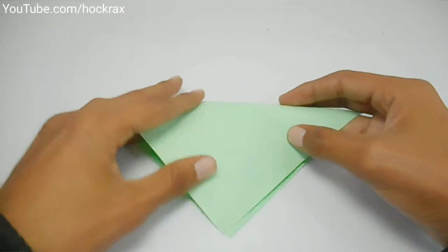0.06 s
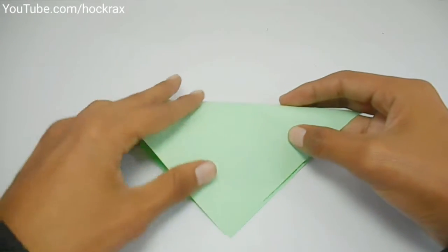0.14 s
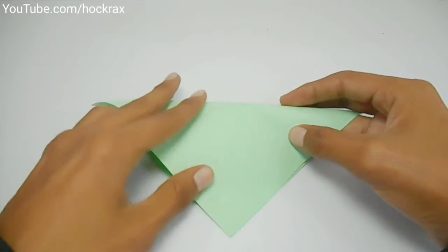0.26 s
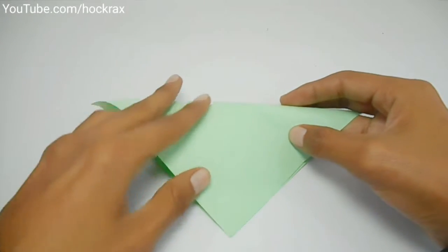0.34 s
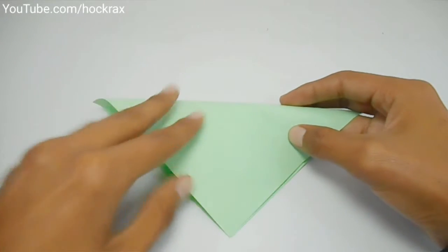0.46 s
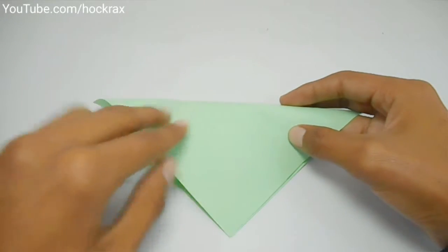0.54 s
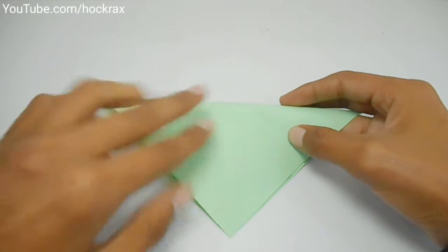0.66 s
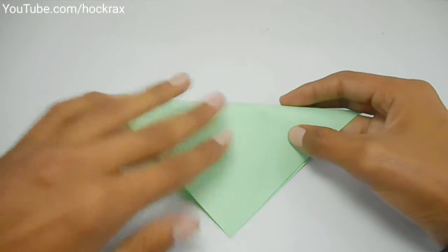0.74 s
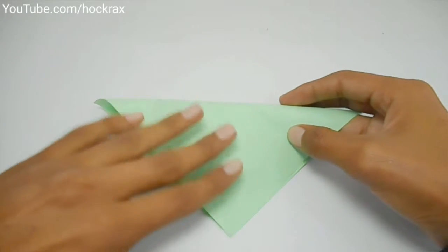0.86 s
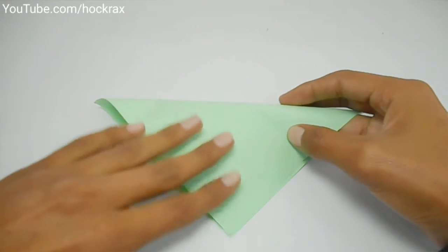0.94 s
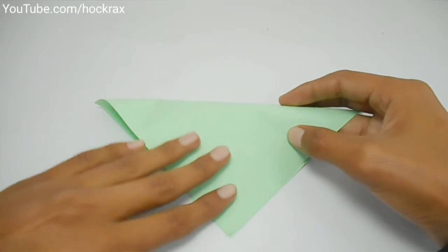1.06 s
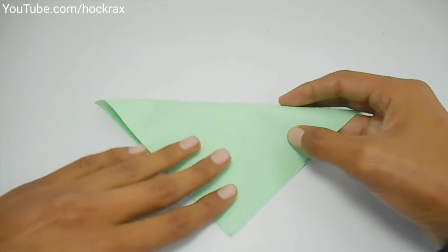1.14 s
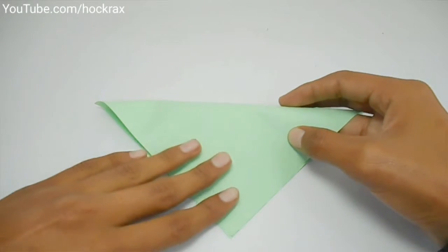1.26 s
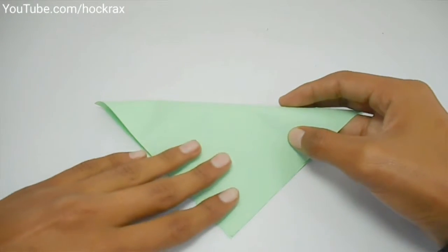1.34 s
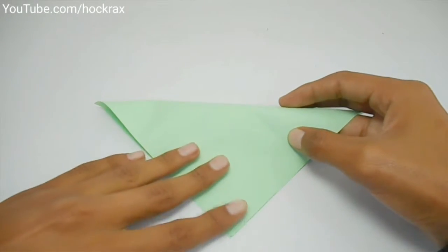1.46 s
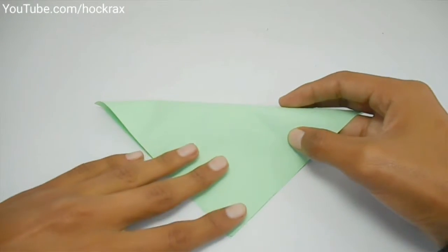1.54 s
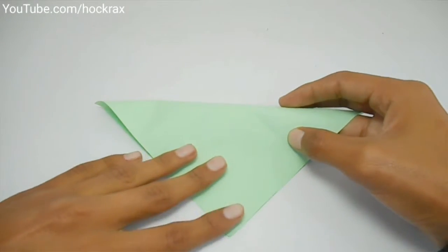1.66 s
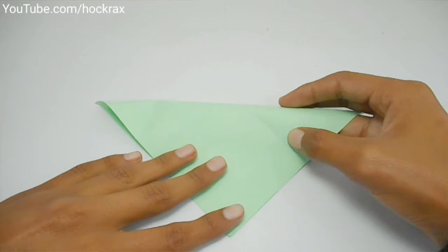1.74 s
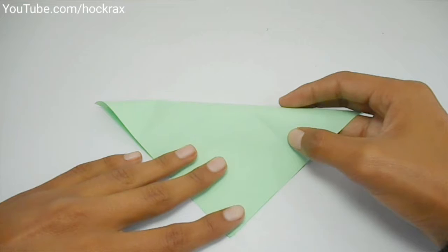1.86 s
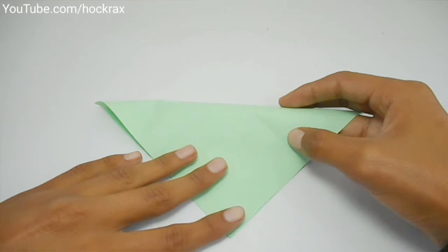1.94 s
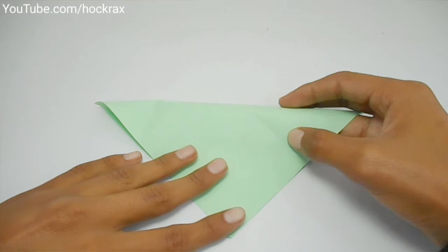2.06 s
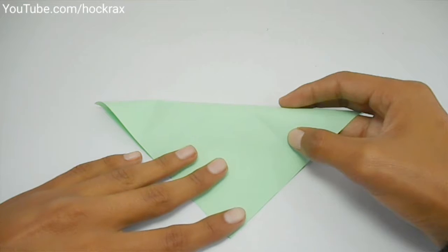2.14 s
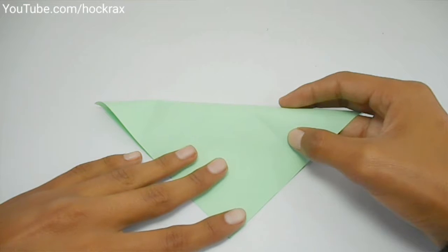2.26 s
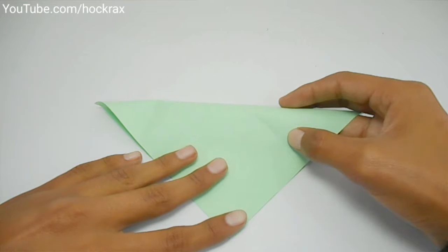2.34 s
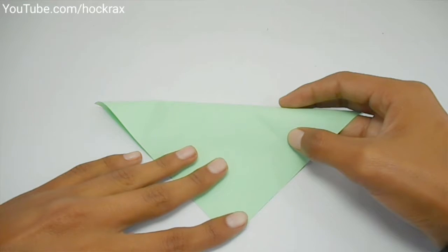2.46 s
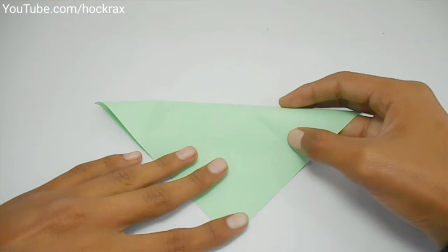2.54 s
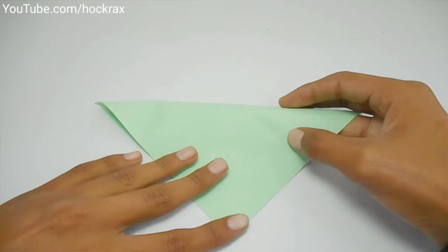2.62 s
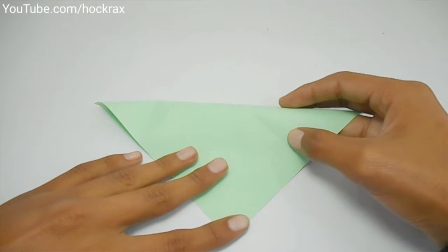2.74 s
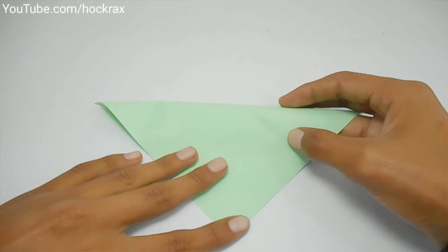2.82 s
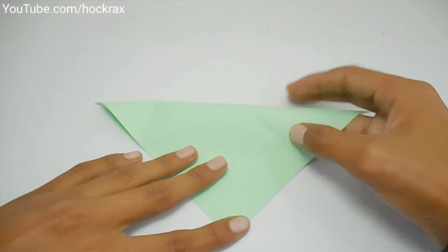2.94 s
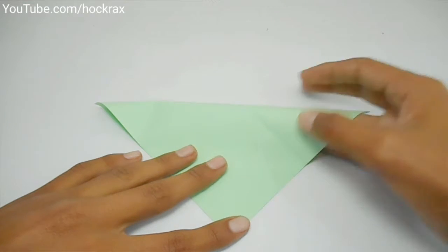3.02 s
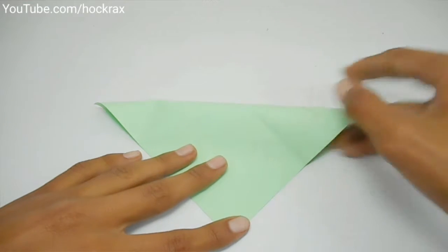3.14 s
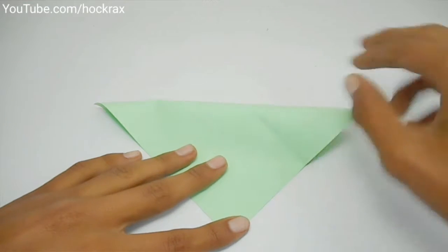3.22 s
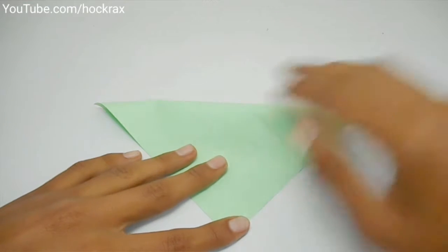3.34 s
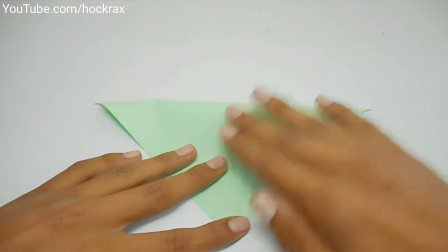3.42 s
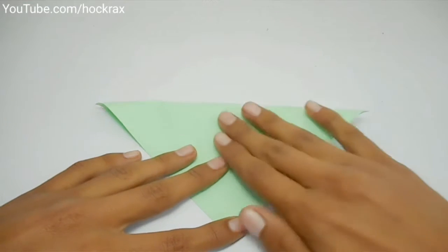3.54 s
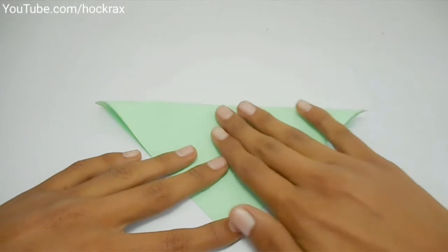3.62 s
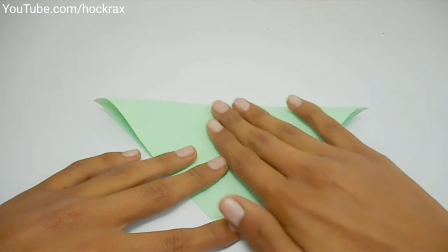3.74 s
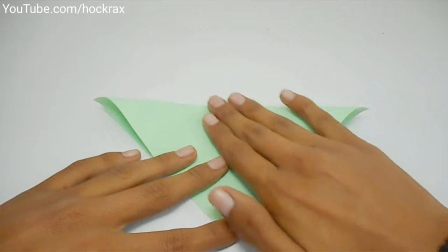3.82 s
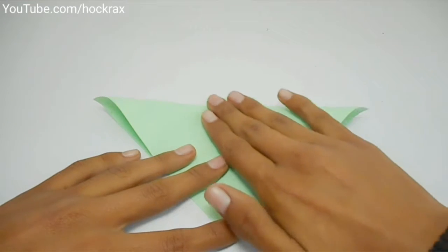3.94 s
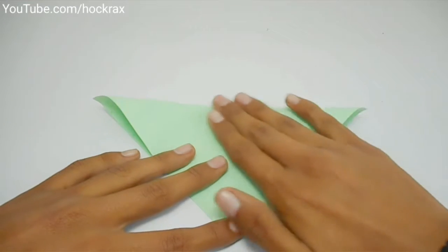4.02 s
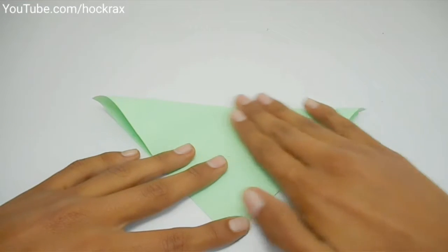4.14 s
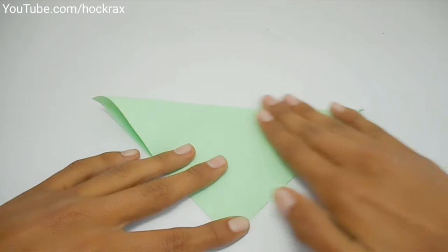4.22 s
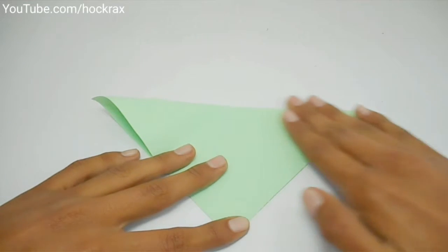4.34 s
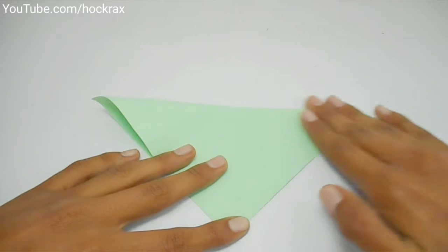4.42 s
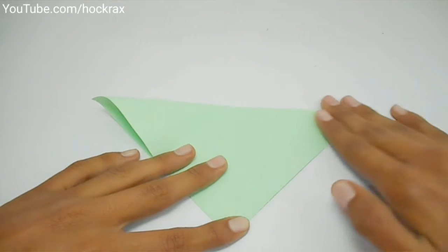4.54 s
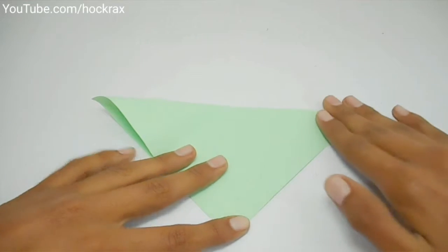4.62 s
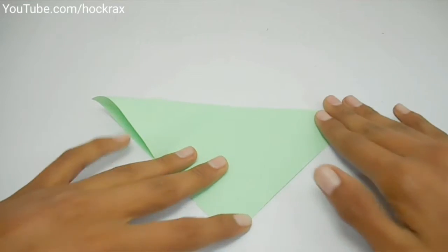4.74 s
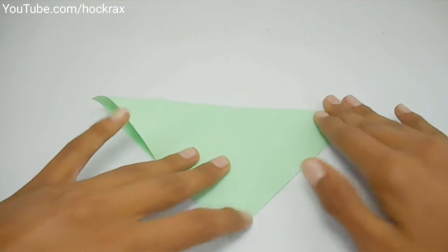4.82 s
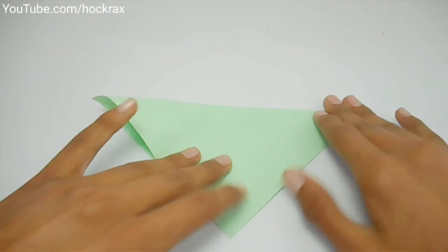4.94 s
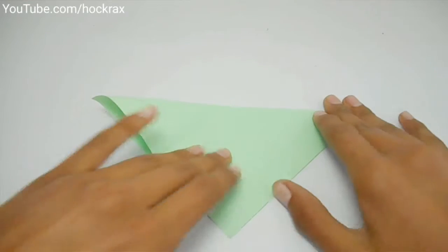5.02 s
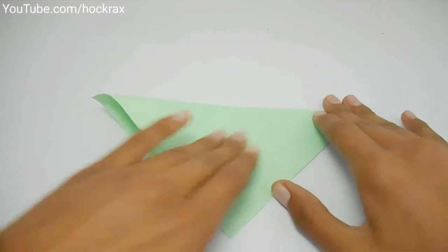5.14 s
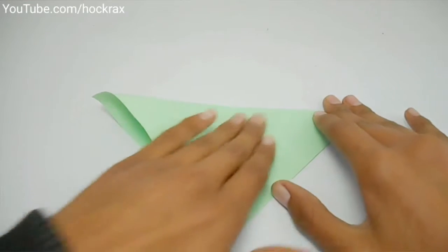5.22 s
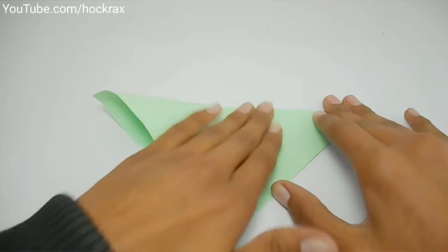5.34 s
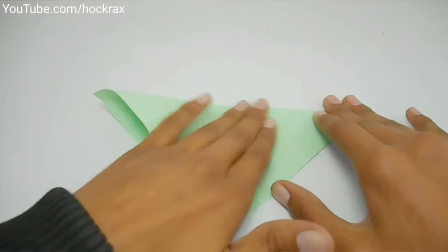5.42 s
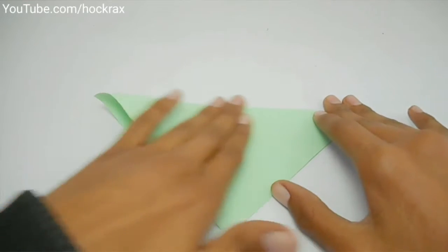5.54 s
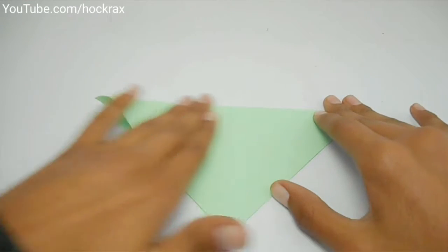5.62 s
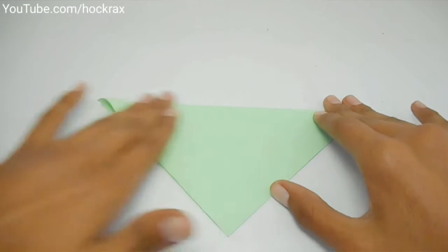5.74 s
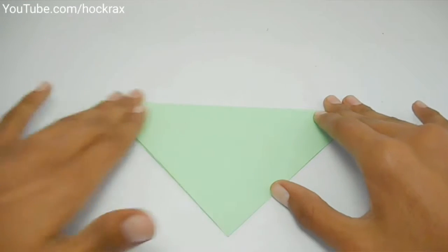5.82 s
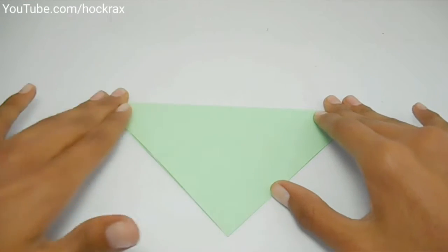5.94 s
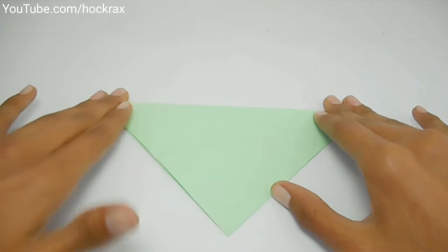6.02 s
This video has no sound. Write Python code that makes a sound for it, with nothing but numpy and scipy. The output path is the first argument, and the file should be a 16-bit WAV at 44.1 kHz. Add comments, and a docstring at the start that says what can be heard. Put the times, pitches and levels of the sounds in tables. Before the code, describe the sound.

Dry paper handling on a table, heard very near: fluttering brushes and ticks first, a distant wavering horn behind them, then a single loud crack of buckling paper. Quiet room air and intermittent low rumble remain until a hand withdraws with a crackling rustle. Dense grainy strokes smooth the fold one way, pause, then the other way, ending with a light pop amid more rubbing.

```python
"""Fingers brush loosely over a raised, folded sheet of paper close to the microphone, as a far horn sounds outside.
Skin dragging on fibres is made of filtered slips; fingers tick on the paper, a faint hiss leads into one loud snap
as it buckles. Firm pushes smooth its crease to the right and to the left, a hand thuds softly, and its curled
corner pops flat over a low body. Behind it lie a quiet room, filtered noise, and a low rumble that comes and goes."""
import sys
import numpy as np
from scipy import signal
from scipy.fft import rfft, irfft
from scipy.io import wavfile
from scipy.ndimage import uniform_filter1d

SR = 44100
rng = np.random.default_rng(int(sys.argv[2]) if len(sys.argv) > 2 else 0)


def wav_record(signal):
    """Record a signal, one row per channel, as 16-bit PCM in the file named by sys.argv[1]."""
    frames = np.transpose(np.atleast_2d(signal))
    bounded = np.clip(frames, -1, 1)
    # unit amplitude maps onto the largest positive 16-bit level
    quanta = np.round(bounded * 32767).astype(np.int16)
    wavfile.write(sys.argv[1], SR, quanta)


N = 267687
TIME = np.arange(N) / SR

# colours of the loose brushes and hiss: (frequency [Hz], relative level per Hz [dB])
LIFT_TONE = [(180, -60), (300, -12), (392, -18), (428, -9), (558, -12), (1190, -4), (2180, -6.5),
             (2970, -3.5), (3250, -6.5), (3550, -6), (6420, -12.5), (9290, -18), (10300, -32), (13400, -64),
             (22000, -120)]
FLICK_TONE = [(300, -23), (600, -9), (1250, -2.5), (2000, 0.5), (3000, -4), (4300, -4.5), (5200, -1),
              (6400, -2.5), (8000, -9), (10300, -16)]  # a fingertip flicks off the paper's edge
SETTLE_TONE = [(300, -12), (800, -10), (1250, -0.5), (1500, -1.5), (2000, 3), (2450, 0.5), (3000, 1.5),
               (4500, -3), (6000, -10.5), (8000, -11), (10300, -26.5)]
RELAX_TONE = [(300, -41), (900, -14), (1350, -13), (1700, -7), (2050, -5), (2500, -9), (3100, -11.5),
              (5000, -15.5), (10300, -33.5)]  # the faint hiss around the snap
WITHDRAW_TONE = [(180, -59), (300, -23), (489, -9.5), (751, -12.5), (1170, -4.5), (1440, -8), (1940, -0.5),
                 (2530, -6.5), (2890, -3.5), (3350, -5.5), (7440, -10.5), (9710, -18), (10300, -26),
                 (13400, -59), (22000, -120)]
SHIFT_TONE = [(300, -2), (600, -4), (950, 3), (1400, -9), (2300, -7), (3300, -8), (6000, -12), (8500, -21),
              (10300, -31)]  # the resting hands shift
# colours of the firm pushes: (frequency [Hz], relative level per Hz [dB])
PRESS_TONE = [(300, -41), (700, -23), (1050, -22), (1300, -6.5), (1900, -5), (2800, -2), (4000, -5),
              (6300, -3), (8000, -8), (10300, -18.5)]
RIGHTWARD_TONE = [(300, -20), (700, -9.5), (1050, -11), (1300, -5.5), (2000, -4.5), (3000, -1),
                  (4000, -3.5), (6500, -1.5), (8000, -5), (10300, -12.5)]
REACH_TONE = [(300, -21), (700, 0.5), (1300, -8), (2000, -3.5), (2900, -0.5), (3500, -4), (4600, -2),
              (6500, -4), (8000, -5.5), (10300, -12.5)]
LEFTWARD_TONE = [(300, -18), (430, -4.5), (850, -2.5), (1350, -4.5), (2000, -4), (3000, 0.3), (3700, -3.5),
                 (5000, -2), (6700, 1), (8200, -1), (10300, -8.5)]

LOW_CUT_HZ = 319  # paper radiates little below this
SNAP_S = 1.5706


def amp(db):
    """Decibels to gain."""
    return 10 ** (np.asarray(db) / 20)


def unit(x):
    """Scales to rms 1."""
    return x / np.sqrt(np.mean(x ** 2) + 1e-20)


def read(points, hz):
    """Reads a spectrum in dB on a log-frequency axis."""
    f, db = np.transpose(points)
    return np.interp(np.log(hz + 1), np.log(f + 1), db)


def colour(x, points):
    """Filters x by a spectrum."""
    hz = np.fft.rfftfreq(len(x), 1 / SR)
    return irfft(rfft(x) * amp(read(points, hz)), len(x))


def wander(rate_hz, size=N):
    """Slow chance of rms 1, mostly below the given rate."""
    slow = np.exp(-(np.fft.rfftfreq(size, 1 / SR) / rate_hz) ** 2)
    return unit(irfft(rfft(rng.standard_normal(size)) * slow, size))


def add(mix, s, sound):
    """Mixes a sound in at time s."""
    part = mix[round(s * SR):][:len(sound)]
    part += sound[:len(part)]


def low_cut(hz):
    """Gain of the steep fall below the paper's lowest resonances."""
    return 1 / np.sqrt(1 + (LOW_CUT_HZ / (hz + 1)) ** 20)


def stroke(start, end, attack, level_db, swell_db, brightness, release=0.0094):
    """A rubbing sound sets in, changes its force steadily and lets go: rows of (time [s], force [dB], brightness)."""
    darken_per_s = -4  # brightness falls during the stroke
    edge_dulling = 0.08  # brightness lost per dB as the stroke sets in or lets go
    s = np.linspace(start - 8 * attack, end + 8 * release, 200)
    onset = 1 + np.exp((start - s) / attack)
    lifting = 1 + np.exp((s - end) / release)
    edges_db = -10 * np.log10(onset * lifting)
    from_middle = np.clip(s, start, end) - (start + end) / 2
    force_db = level_db + swell_db * from_middle / (end - start) + edges_db
    return np.transpose([s, force_db, brightness + darken_per_s * from_middle + edge_dulling * edges_db])


def rub(motion, tone, resonances, grain_db, flutter_db, patchy_db, slips_per_s, free_hz=None):
    """Skin drags over paper fibres: countless tiny slips and some larger ones sound through the sheet."""
    wander_octaves = 0.014  # the sheet's resonances shift with the changing grip
    rise_octaves_per_s = 0.11  # and climb a little as the hand advances
    tilt = 0.39  # dB per octave for each step of brightness
    s, force_db, brightness = np.transpose(motion)
    span = slice(max(int(s[0] * SR), 0), int(s[-1] * SR))
    t = TIME[span]
    sizes = amp(grain_db * np.minimum(rng.exponential(1, SR), 4)) * rng.choice([-1, 1], SR)
    large_slips = unit(sizes * (rng.random(SR) < slips_per_s / SR))
    slips = large_slips + rng.standard_normal(SR)
    hz, frames, z = signal.stft(slips[:len(t)], SR, nperseg=1024)

    shift = wander_octaves * np.interp(frames, TIME[:SR], wander(11, size=SR))
    climb = 2 ** (rise_octaves_per_s * (frames - frames.mean()) + shift)
    body_db = read(tone, hz)[:, None]
    for f, width, db in resonances:
        body_db = body_db + db / (1 + (2 * (hz[:, None] - f * climb) / width) ** 2)
    # narrow bands come and go by chance
    patches = uniform_filter1d(rng.standard_normal((len(hz), SR // 512)), size=3, axis=0)
    patches = unit(uniform_filter1d(patches, size=12, axis=1))
    # brightness tilts the spectrum about 3 kHz
    octaves = np.log2(np.clip(hz, 1000, 8000) / 3000)[:, None]
    tilt_db = tilt * octaves * np.interp(t[0] + frames, s, brightness)
    free_db = free_paper_db(hz, frames, free_hz) if free_hz else 0

    gain_db = body_db + tilt_db + free_db + patchy_db * patches[:, :len(frames)]
    gain = amp(gain_db) * low_cut(hz)[:, None]
    even_gain = gain / np.linalg.norm(gain, axis=0)  # colour leaves the level to the force
    hiss = unit(signal.istft(z * even_gain, SR)[1][:len(t)])
    flutter = flutter_db * wander(53, size=SR)[:len(t)]
    out = np.zeros(N)
    out[span] = hiss * amp(np.interp(t, s, force_db) + flutter)
    return out


def catching(x, below_hz=3000, catch_hz=150, catch_db=0.9):
    """Lightly pressed skin sticks and lets go in quick surges that shake the sheet's lower resonances."""
    low_pass = signal.butter(2, below_hz, fs=SR, output="sos")
    body = signal.sosfiltfilt(low_pass, x + 1e-12)
    surges = unit(amp(catch_db * wander(catch_hz)))
    return x + body * (surges - 1)


def brushes():
    """Loose brushes over the raised sheet catch on its fibres; a faint hiss leads into the snap and fades after it."""
    # resonances of the raised sheet: (frequency [Hz], width [Hz], lift [dB])
    loose_sheet = [(1250, 154, 8), (1598, 80, 8.5), (1970, 240, 1.5), (2700, 150, 0.5), (3680, 200, 1),
                   (5220, 260, 2), (6330, 290, 3.5)]
    # each brush or stretch of hiss: (start [s], end [s], level [dB], swell from start to end [dB],
    # brightness [0.39 dB per octave], colour)
    brush_moves = [(-0.02, 0.124, -49, -3.5, 1.5, LIFT_TONE), (0.122, 0.21, -45, 2, -3.5, LIFT_TONE),
                   (0.212, 0.275, -43.5, 3, 3, LIFT_TONE), (0.286, 0.335, -42, 2.5, -2, LIFT_TONE),
                   (0.336, 0.365, -47, 7, 0, LIFT_TONE), (0.371, 0.405, -41.5, 3, -5, LIFT_TONE),
                   (0.423, 0.56, -39, 2.5, -1.5, LIFT_TONE), (0.563, 0.601, -41, 2, 4, LIFT_TONE),
                   (0.608, 0.649, -38, 2.5, 1.5, FLICK_TONE), (0.683, 0.93, -57, -4, 2, SETTLE_TONE),
                   (1.014, 1.07, -53.5, 0, -5, SETTLE_TONE), (1.123, 1.362, -49.5, -0.5, -4, SETTLE_TONE),
                   (1.382, 1.407, -47.5, 5, 0.5, SETTLE_TONE), (1.53, 1.74, -52, -2, 3.5, RELAX_TONE),
                   (1.758, 1.795, -53, -2, -4, RELAX_TONE), (3.015, 3.195, -46, 2.5, -2.5, WITHDRAW_TONE),
                   (3.189, 3.288, -39, 8.5, 1.5, WITHDRAW_TONE), (3.293, 3.311, -38, 1, 4, WITHDRAW_TONE),
                   (3.319, 3.61, -56, 1, 0, WITHDRAW_TONE), (4.78, 5.163, -57.5, -1.5, 0.5, SHIFT_TONE)]
    out = np.zeros(N)
    for start, end, level_db, swell_db, brightness, tone in brush_moves:
        motion = stroke(start, end, 0.0025, level_db, swell_db, brightness)
        rubbed = rub(motion, tone, loose_sheet, grain_db=1.7, flutter_db=0.5, patchy_db=2.8, slips_per_s=2600)
        out += catching(rubbed)
    return out


def background(air_db=-56, air_waver_db=.5, rumble_db=-65.0, dip_db=-26, lull_db=-43):
    """Nearly steady room air over a low rumble that dips often and now and then drops away."""
    # colour of the room air: (frequency [Hz], relative level per Hz [dB])
    air_tone = [(300, -16), (370, -5.5), (480, -3), (720, -6), (870, -2.5), (1150, -2.5), (1600, -8.5),
                (2800, -8.5), (3700, -14), (5400, -17.5), (7500, -22), (9300, -27), (10300, -47)]
    # colour of the rumble: (frequency [Hz], relative level per Hz [dB])
    rumble_tone = [(20, -19), (50, -7.5), (80, 3.5), (120, -2), (165, 3), (230, -9.5), (300, -1),
                   (380, -43)]
    # the rumble drops away: (middle [s], length [s])
    lulls = [(0.675, 0.11), (1.08, 0.1), (1.46, 0.11), (1.71, 0.15), (2.388, 0.11), (2.917, 0.17),
             (3.245, 0.14), (3.725, 0.1), (4.008, 0.18), (4.45, 0.065), (5.612, 0.062), (5.891, 0.15)]
    dip_gap_s, dip_s = 0.15, 0.033  # mean spacing and length of the chance dips
    hiss = irfft(rfft(rng.standard_normal(N)) * low_cut(np.fft.rfftfreq(N, 1 / SR)), N)
    air = amp(air_db + air_waver_db * wander(26)) * unit(colour(hiss, air_tone))
    lull = sum(np.exp(-np.minimum(abs(2 * (TIME - s) / length), 2) ** 6) for s, length in lulls)
    gaps, depths = rng.uniform(0.5, 1.5, (2, 64))
    dips = np.zeros(N)
    for s, depth in zip(np.cumsum(gaps) * dip_gap_s, depths):
        dips += depth * np.exp(-np.minimum((2 * (TIME - s) / dip_s) ** 2, 20))
    rumble = unit(colour(rng.standard_normal(N), rumble_tone))
    return air + amp(rumble_db + np.minimum(lull_db * lull, dip_db * dips)) * rumble


def horn(rise=0.06, release=0.059, linger=0.15, linger_db=-7, waver_db=3.0, root_waver_db=2.0, root_sink_db_per_s=-2.5):
    """A far vehicle horn: weak fundamentals and a blare near 3 kHz that builds up, wavers, sinks as it fades, echoes."""
    # two close notes: (start [s], end [s], pitch [Hz], pitch unsteadiness [share],
    # fundamental's first level [dB], blare level [dB])
    notes = [(0.115, 0.68, 430.3, 0.0005, -55.5, -58.2), (0.22, 0.78, 440.2, 0.002, -78, -57.8)]
    # harmonics of the blare: (harmonic number, level against the blare [dB], build-up [s])
    blare_harmonics = [(7, 2.3, 0.066), (8, 2.8, 0.15)]
    sag_share, sag_s = 0.015, 0.09  # how far and how soon the pitch sinks once a note is let go
    echo_s, echo_db = 0.36, -14  # the blare returns from far houses
    root, blare = np.zeros((2, N))
    for start, end, hz, drift, root_db, blare_db in notes:
        age, since = np.maximum(TIME - start, 0), np.maximum(TIME - end, 0)
        sag = sag_share * (1 - np.exp(-(since / sag_s) ** 2))
        turns = np.cumsum(hz * (1 + drift * wander(25) - sag)) / SR
        held = np.exp(-since / release)
        level = amp(root_db + root_sink_db_per_s * age + root_waver_db * wander(10))
        root += level * np.minimum(age / rise, 1) * held * np.sqrt(2) * np.sin(2 * np.pi * turns)
        lingering = np.maximum(held, amp(linger_db) * np.exp(-since / linger))
        for k, db, build_up in blare_harmonics:
            level = amp(blare_db + db + waver_db * wander(22)) * (1 - np.exp(-(age / build_up) ** 2))
            blare += level * lingering * np.sqrt(2) * np.sin(2 * np.pi * k * turns)
    out = root + blare
    add(out, echo_s, amp(echo_db) * blare)
    return out


def cluster(centre_hz, octaves, rise, decay):
    """A short burst of noise in one band, with the energy of its envelope."""
    t, hz = TIME[:16384], np.fft.rfftfreq(16384, 1 / SR)
    band = np.exp(-(np.log2((hz + 1) / centre_hz) / octaves) ** 2)
    envelope = (1 - np.exp(-t / rise)) * np.exp(-t / decay)
    burst = envelope * irfft(band * np.exp(2j * np.pi * rng.random(len(hz))))
    return burst * np.linalg.norm(envelope) / np.linalg.norm(burst)


def ticks(level_db=-8, tick_rise=0.00053, scuff_rise=0.0027, edge_db=-15):
    """Nails and paper edges tick with a brief bright edge; resting fingertips scuff softly."""
    # sharp ticks: (time [s], level before the common level_db [dB], centre [Hz], width [octaves], decay [s])
    tick_hits = [(0.378, -30, 1250, 0.3, 0.008), (0.463, -25.5, 1460, 0.39, 0.0051),
                 (0.531, -27, 2600, 1.1, 0.003), (0.620, -34, 3000, 1.1, 0.002),
                 (0.637, -22, 1710, 1.1, 0.0053), (1.131, -38, 1300, 0.3, 0.016),
                 (1.234, -37, 1610, 0.8, 0.0037), (1.323, -36, 1900, 1.44, 0.0046),
                 (1.705, -33.5, 1460, 0.87, 0.0098), (2.070, -40, 2400, 1.4, 0.004),
                 (2.137, -38, 2300, 1.1, 0.0025), (2.175, -41, 2200, 0.87, 0.003),
                 (2.615, -34.5, 2850, 1.35, 0.0054), (2.6925, -34.5, 2650, 1.24, 0.0025),
                 (2.936, -45.5, 6000, 0.7, 0.003), (3.015, -24.5, 1910, 0.27, 0.0037),
                 (3.039, -30, 2140, 1.1, 0.013), (3.221, -28, 1460, 0.57, 0.0033),
                 (3.2465, -24, 1350, 0.63, 0.0031), (3.258, -23, 1900, 1.2, 0.0021),
                 (3.272, -20, 2700, 1.2, 0.0052), (3.279, -19.5, 2390, 1.35, 0.0037),
                 (3.2865, -26, 2300, 0.99, 0.0012), (3.3044, -18.5, 2150, 1.48, 0.0038),
                 (3.6287, -12, 1850, 0.62, 0.00077), (3.642, -31, 1310, 0.36, 0.0034),
                 (3.664, -22, 2010, 0.46, 0.0013), (3.930, -34.5, 905, 0.66, 0.0082),
                 (4.18, -19, 3640, 0.76, 0.004), (4.493, -27, 4600, 0.6, 0.007),
                 (5.809, -23.5, 2900, 0.5, 0.0018)]
    # soft scuffs: (time [s], level before the common level_db [dB], centre [Hz])
    scuffs = [(0.702, -29.5, 2070), (1.028, -41, 1500), (1.46, -46.5, 4000), (2.053, -39.5, 2200),
              (2.125, -43.5, 2900), (2.298, -44.5, 3750), (2.486, -40.5, 3600), (2.619, -50, 3000),
              (2.688, -49, 4000), (3.631, -33, 1400), (4.797, -43.5, 4480), (5.005, -39.5, 4000),
              (5.524, -31.5, 1850)]
    out = np.zeros(N)
    for s, db, centre_hz, octaves, decay in tick_hits:
        add(out, s, amp(db + level_db) * cluster(centre_hz, octaves, tick_rise, decay))
        edge = cluster(centre_hz=5000, octaves=0.63, rise=tick_rise, decay=0.0013)
        add(out, s, amp(db + level_db + edge_db) * edge)
    for s, db, centre_hz in scuffs:
        add(out, s, amp(db + level_db) * cluster(centre_hz, octaves=1.27, rise=scuff_rise, decay=0.014))
    return out


def room(x, wet_db, t60=0.78, treble_t60=0.88, delay=0.0023):
    """A faint diffuse tail of decaying noise, with its own decay for middle and treble."""
    hz, t, z = signal.stft(rng.standard_normal(SR // 2), SR, nperseg=256)
    decay = read([(2000, t60), (8000, treble_t60)], hz)[:, None]
    tail = signal.istft(z * amp(-60 * t / decay), SR)[1]
    tail[:int(delay * SR)] = 0
    return amp(wet_db) * signal.fftconvolve(x, tail / np.linalg.norm(tail))[:N]


def buckle(s, modes, level_db, rise, stop_after, crack_db, crack_decay=0.0024, flip_time=0.0035, after_db=0):
    """Curved paper flips over with a crack, rings on by after_db once flipped, then stops abruptly."""
    # colour of fibres giving way: (frequency [Hz], relative level per Hz [dB])
    crack_tone = [(300, -46), (700, -30), (1300, 4), (3200, 7), (6500, -0.5), (10000, -24)]
    t = TIME[:SR // 20]
    ring = sum(amp(db - 60 * t / t60) * np.sin(2 * np.pi * hz * t) for hz, db, t60 in modes)
    crack = unit(colour(rng.standard_normal(len(t)), crack_tone)) * np.exp(-t / crack_decay)
    after = amp(after_db)
    flip = after + (1 - after) / (1 + (t / flip_time) ** 8)
    onset = 1 - np.exp(-(t / rise) ** 2)
    stop = 1 / (1 + (t / stop_after) ** 8)
    sound = (ring + amp(crack_db) * crack) * flip * onset * stop
    out = np.zeros(N)
    add(out, s, amp(level_db) * sound / abs(sound).max())
    high_pass = signal.butter(4, LOW_CUT_HZ, "high", fs=SR, output="sos")
    return signal.sosfilt(high_pass, out)


def snap():
    """The whole sheet buckles: a few strong cycles, then a weaker ring until it breaks off."""
    # ring of the sheet: (frequency [Hz], relative level [dB], t60 before the stop [s])
    sheet_modes = [(723, -31.5, 0.048), (1337, -12, 0.049), (1860, -13, 0.036), (2020, 3, 0.024),
                   (2138, -7.5, 0.027), (2280, -9, 0.021), (2896, -7.5, 0.022), (3240, -18, 0.025),
                   (3830, -16, 0.026), (4520, -8.5, 0.014), (4070, -26, 0.025), (5340, -32, 0.03),
                   (6230, -38, 0.025), (8050, -29, 0.013)]
    return buckle(SNAP_S, sheet_modes, level_db=-3.1, rise=0.00099, stop_after=0.011,
                  crack_db=-18.0, crack_decay=0.0051, flip_time=0.0035, after_db=-5)


def after_ring(rattle_db=2.5, rattle_hz=130):
    """The sheet's resonances around 2 kHz linger after the snap, rattling lightly against the table."""
    # shivering bands: (centre [Hz], level [dB], width [octaves], decay [s])
    shiver = [(1400, -56, 0.06, 0.05), (1870, -54, 0.04, 0.055), (2026, -45, 0.039, 0.049),
              (2170, -50.5, 0.14, 0.065)]
    out = np.zeros(N)
    for centre_hz, level_db, octaves, decay in shiver:
        add(out, SNAP_S, amp(level_db) * cluster(centre_hz, octaves, rise=0.005, decay=decay))
    return out * unit(amp(rattle_db * wander(rattle_hz)))


def free_paper_db(hz, since, first_hz, lift_db=4.5, octaves=0.86, climb_octaves_per_s=2.3):
    """A broad resonance that climbs as the fingers near the tip of the fold and the free paper shortens."""
    away = np.log2((hz[:, None] + 1) / first_hz) - climb_octaves_per_s * since
    return lift_db * np.exp(-(away / octaves) ** 2)


def pushes():
    """Fingers press firmly and smooth the flat crease with a dense grain, driving the free paper ahead."""
    # resonances of the flat sheet: (frequency [Hz], width [Hz], lift [dB])
    flat_sheet = [(1300, 93, 6.8), (1577, 96, 6.8), (2210, 41, 8.6), (2840, 240, 2.9), (3790, 130, 5.1),
                  (4420, 360, 2.2), (4950, 330, 3), (5670, 150, 1.5), (6800, 510, 1.5)]
    # each push: (start [s], end [s], attack [s], level [dB], swell over the stroke [dB],
    # brightness [0.39 dB per octave], free paper's first pitch [Hz], contact colour)
    push_moves = [(3.629, 3.65, 0.001, -45.5, 0, -7, 1400, PRESS_TONE),
                  (3.656, 3.764, 0.0049, -39, 5, -1.5, 2100, PRESS_TONE),
                  (3.771, 3.814, 0.0048, -42.5, 4, 3, 2400, PRESS_TONE),
                  (3.821, 3.907, 0.005, -39, 1.5, -1, 3080, PRESS_TONE),
                  (3.914, 4.043, 0.0049, -41.5, -1, 1.5, 2340, PRESS_TONE),
                  (4.105, 4.19, 0.011, -47, 8.5, -8, 2000, RIGHTWARD_TONE),
                  (4.184, 4.332, 0.004, -38, 1.5, 0, 2720, RIGHTWARD_TONE),
                  (4.336, 4.51, 0.0069, -38, 0, 2.5, 4030, RIGHTWARD_TONE),
                  (4.51, 4.711, 0.0051, -44.5, -1.5, 0.5, 4850, RIGHTWARD_TONE),
                  (5.127, 5.185, 0.0059, -52, 0, -5, 3000, REACH_TONE),
                  (5.188, 5.353, 0.0042, -46.5, -1.5, 1, 5000, REACH_TONE),
                  (5.359, 5.528, 0.0079, -46, -2.5, 0, 5000, REACH_TONE),
                  (5.594, 5.67, 0.0049, -44, -1, -0.5, 4020, LEFTWARD_TONE),
                  (5.668, 5.772, 0.0051, -42, -0.5, -2, 2700, LEFTWARD_TONE),
                  (5.773, 5.948, 0.0051, -39.5, 0, -1.5, 3780, LEFTWARD_TONE),
                  (5.944, 6.08, 0.004, -45, -2, -2.5, 2920, LEFTWARD_TONE)]
    out = np.zeros(N)
    for *push, free_hz, tone in push_moves:
        out += rub(stroke(*push), tone, flat_sheet, grain_db=2.1, flutter_db=0.3, patchy_db=3.0,
                   slips_per_s=6000, free_hz=free_hz)
    return out


def low_bursts(octaves=0.72, rise=0.006, decay=0.023):
    """Short, dull bursts: a hand's thud, and a low body under the corner's pop."""
    # dull bursts: (time [s], level [dB], centre [Hz])
    bursts = [(5.161, -49.5, 104), (5.545, -50.5, 520), (5.762, -52, 290)]
    out = np.zeros(N)
    for s, db, centre_hz in bursts:
        add(out, s, amp(db) * cluster(centre_hz, octaves, rise, decay))
    return out


def corner_pop():
    """The curled corner pops flat with a crack and rings until it breaks off."""
    # ring of the corner: (frequency [Hz], relative level [dB], t60 before the stop [s])
    corner_modes = [(564, -16, 0.049), (930, -9.5, 0.024), (1253, -11.5, 0.037), (1556, -7, 0.038),
                    (2035, -3.5, 0.025), (2290, -1, 0.024), (2810, 3, 0.015), (3250, 0.5, 0.016),
                    (5070, -9.5, 0.02), (6600, -14, .009)]
    return buckle(5.7601, corner_modes, level_db=-12.0, rise=0.00059, stop_after=0.018, crack_db=-7.0)


def scene():
    """Paper and hands close to the microphone, the room and the street behind."""
    clicks = ticks() + snap() + corner_pop()
    rubbing = brushes() + pushes()
    near = clicks + room(clicks, wet_db=-24.5) + after_ring() + rubbing + low_bursts()
    return (near + background() + horn())[None]


def record(dry, band_hz=10450, edge_hz=15600):
    """Limits the band as a recorder at half the sample rate would, and mirrors its top faintly upwards."""
    # treble folded above half the recorder's rate: (frequency [Hz], gain [dB])
    mirror = [(11600, -7.5), (12300, -9), (13200, -22), (14200, -26), (15400, -43)]
    narrow = signal.oaconvolve(dry[0], signal.firwin(255, band_hz, fs=SR), "same")
    flipped = narrow * np.cos(np.pi * np.arange(N))  # alternating signs turn the spectrum upside down
    mirrored = colour(flipped, mirror)
    edge = signal.firwin(511, edge_hz, window=("kaiser", 9), fs=SR)
    return signal.oaconvolve(narrow + mirrored, edge, "same")[None]


dry = scene()
out = record(dry)
wav_record(out)
```